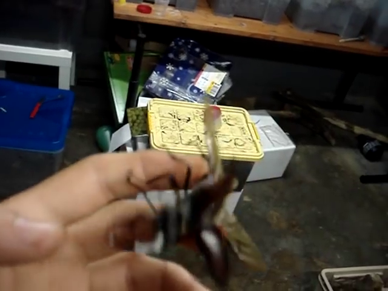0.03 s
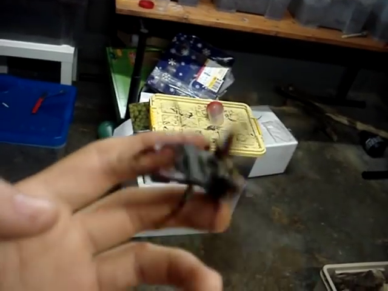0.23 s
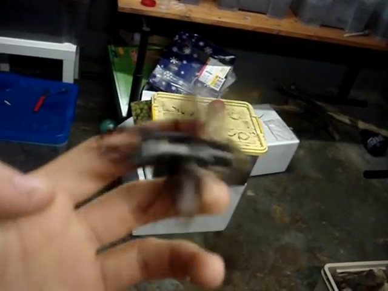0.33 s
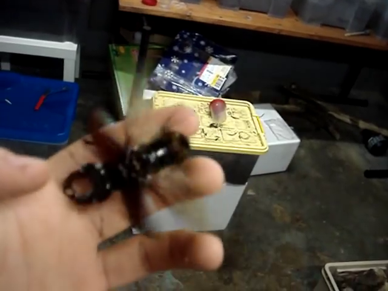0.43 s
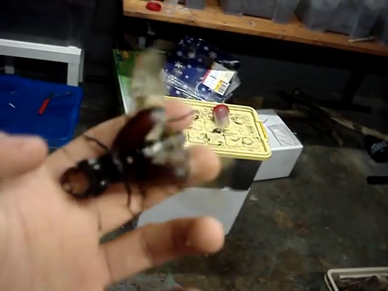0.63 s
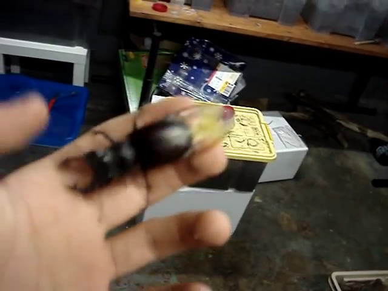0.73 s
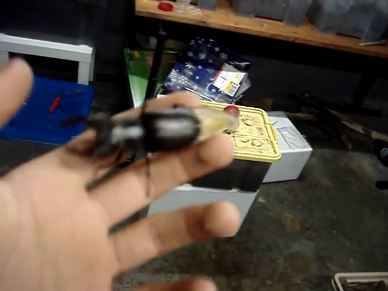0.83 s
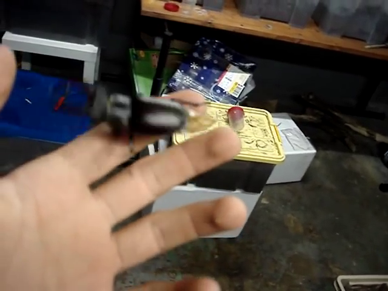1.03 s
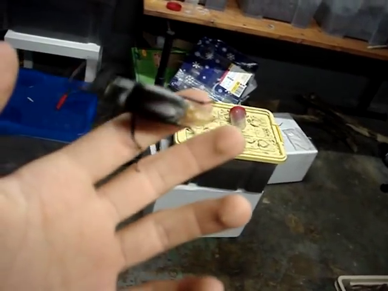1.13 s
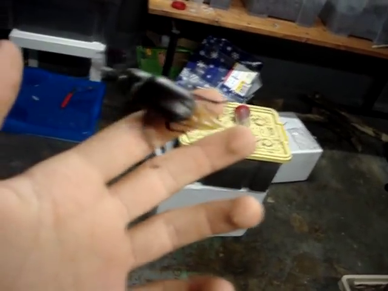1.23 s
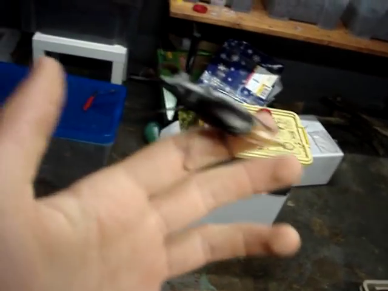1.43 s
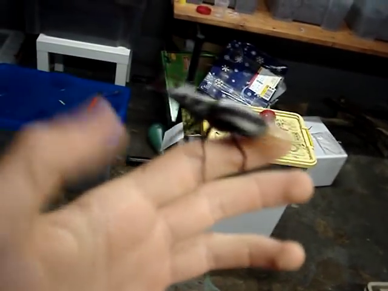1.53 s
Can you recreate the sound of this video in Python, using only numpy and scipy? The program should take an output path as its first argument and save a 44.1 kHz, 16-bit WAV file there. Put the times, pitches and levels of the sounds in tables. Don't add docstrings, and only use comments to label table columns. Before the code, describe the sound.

A large beetle's wings flutter in one brief, loud, crackling burst close up, in a quiet room

```python
import sys
import numpy as np
from scipy import signal
from scipy.fft import rfft, irfft
from scipy.io import wavfile
from scipy.ndimage import uniform_filter1d, minimum_filter1d

SR = 44100
rng = np.random.default_rng(int(sys.argv[2]) if len(sys.argv) > 2 else 0)


def persist_wave(psi):
    counts = np.round(np.clip(psi, -1, 1) * 32767).astype(np.int16)
    wavfile.write(sys.argv[1], SR, np.atleast_2d(counts).T)


def ratio(d):
    e = np.asarray(d, float) / 20
    return 10 ** e


N = 70560
T = np.arange(N) / SR

# t/s, clap level/dB, air push level/dB, body thud level/dB, scrape level/dB
WING_BEATS = [(0.2008, -36.5, -66, -37, -46), (.2250, -17.5, -39.5, -33, -36),
              (0.2491, -55, -36, -29, -43.5), (0.2707, -9, -28, -21, -24.5), (0.2931, -11, -36, -23, -28),
              (0.318, -11.5, -39, -20, -28.5), (0.3426, -6.5, -27, -26, -25.5),
              (0.3657, -8, -23, -29.5, -25), (0.3893, -9, -23.5, -41.5, -25.5),
              (0.4133, -12, -21.5, -31, -26.5), (0.4357, -13.5, -23.5, -33, -27),
              (0.4573, -13.5, -23, -34, -53), (0.4819, -16, -57, -35, -30), (0.5056, -13.5, -58, -49, -40)]
# t/s, level/dB, f/Hz
MEMBRANE_SNAPS = [(0.2489, -23.5, 1100), (0.2502, -17.5, 2000), (0.2722, -15, 4440), (0.2844, -24.5, 970),
                  (0.3197, -9.5, 4500), (.3463, -30, 3210), (0.3685, -14.5, 1076), (0.3765, -19, 4600),
                  (0.392, -16, 2800), (0.409, -21, 5000), (0.4142, -9.5, 2950), (.4325, -14, 6000),
                  (0.4359, -14.5, 1400), (.4548, -16, 5500), (0.4704, -14.5, 2500), (0.4817, -14.5, 3670),
                  (0.495, -19, 6400), (0.5181, -20.5, 2000), (0.5244, -18.5, 1800), (0.5292, -22, 2500),
                  (0.557, -23.5, 1500), (.5820, -34.5, 1500), (0.607, -29.5, 1100), (0.6379, -25.5, 3580),
                  (0.7184, -38.5, 500)]
# t/s, level/dB, brightness/1 (0 dull to 1 bright)
RUSTLE_COURSE = [
    (.18, -78, .2),
    (.23, -47.5, 0.6),
    (.3, -37.5, 0.2),
    (.39, -36.5, 0.32),
    (0.441, -34, 0.81),
    (.5, -33, 0.91),
    (.56, -43, 1),
    (0.641, -55, 0.64),
    (0.741, -58, 0.27),
]
# f/Hz, bandwidth/Hz, level/dB
CLAP_MODES = [(1100, 407, -11), (2800, 760, -4.5), (4246, 860, 1), (6000, 775, -4), (8560, 2700, -2.5)]
# f/Hz, spectral level/dB
MEMBRANE_SPECTRUM = [(120, -28), (220, -0.5), (900, -1.5), (1700, -5), (3300, -4), (4300, -2.5), (5800, -2),
                     (10000, -4.5), (13000, -56)]
# f/Hz, spectral level/dB
HISS_SPECTRUM = [(12, -54), (20, -22.5), (141, -2.5), (243, -1.5), (323, -1.5), (938, -6.5), (2160, -12.5),
                 (2590, -12.5), (10000, -21), (13000, -86), (22000, -120)]
# f/Hz, spectral level/dB
WAKE_SPECTRUM = [(15, -1), (60, 3), (180, -2), (400, -33), (1000, -53)]
# t/s, level/dB, f/Hz, bandwidth/Hz
CLAW_TICKS = [
    (.9135, -42, 2100, 110),
    (1.005, -42, 3600, 500),
    (1.417, -44.5, 2130, 110),
]

HISS_DB = -51.5
GRAINS_PER_S, GRAIN_DB, GRAIN_SHARE = 3000, 4, 0.56
GRAIN_LOW_HZ, GRAIN_HIGH_HZ, GRAIN_DAMPING = 714, 9400, 0.38
DULL_HZ, DULL_DB_PER_OCT = 4500, -22.5
UPSTROKE, UPSTROKE_DB, UPSTROKE_S = 0.486, 2.5, 0.0016
WAKE_DB, WAKE_SHARE = -50.5, 0.9
PUSH_RISE_S, PUSH_FALL_S, SUCK_S, SUCK = 0.0007, 0.0023, 0.0038, 0.3
SCRAPE_LEAD_S, SCRAPE_RISE_S, SCRAPE_HOLD_S, SCRAPE_FALL_S = 0.0024, 0.0025, 0.0038, 0.002
CLAP_SPREAD_DB, THUD_HZ, THUD_WIDTH_HZ = 2.2, 368, 92
SOFT_CYCLES = 0.43
SNAP_DAMPING, SNAP_EDGE = 0.36, 0.73
WING_LOW_HZ = 164
ROOM_DB, ROOM_T60_S = -10.5, 0.53
BASS_CUT_HZ, EDGE_HZ = 13.3, 10150
STARVE_FROM_HZ, STARVE_DB, STARVE_DB_PER_KHZ = 3500, -20.5, -0.13
STARVE_CHANCE_DB, STARVED_DB = 5.5, -35
BLOCK, BAND_BINS, REACH_BLOCKS = 256, 6, 13


def evened(x):
    return x / np.sqrt(np.mean(x ** 2) + 1e-20)


def coloured(x, points):
    f, db = np.transpose(points)
    gain_db = np.interp(np.log(np.fft.rfftfreq(N, 1 / SR) + 1), np.log(f), db)
    return irfft(rfft(x) * ratio(gain_db), N)


def ring(s, hz, width):
    t = np.maximum(T - s, 0)
    onset = 1 - np.exp(-t * hz / SOFT_CYCLES)
    return -np.sin(2 * np.pi * hz * t) * np.exp(-np.pi * width * t) * onset


def bump(s, rise, fall):
    t = np.maximum(T - s, 0)
    pulse = (1 - np.exp(-t / rise)) ** 2 * np.exp(-t / fall)
    return pulse / pulse.max()


def hiss():
    slow = uniform_filter1d(uniform_filter1d(rng.standard_normal(N), size=3000), size=3000)
    return ratio(HISS_DB + 0.5 * evened(slow)) * evened(coloured(rng.standard_normal(N), HISS_SPECTRUM))


def crackle():
    size = ratio(GRAIN_DB * np.minimum(rng.exponential(1, N), 3.0)) * rng.choice([-1., 1.], N)
    size = size * (rng.random(N) < GRAINS_PER_S / SR)
    kind = rng.integers(0, 12, size=N)
    grains = np.zeros(N)
    for k, hz in enumerate(np.linspace(GRAIN_LOW_HZ, GRAIN_HIGH_HZ, num=12)):
        grain = hz ** 0.86 * ring(0, hz, GRAIN_DAMPING * hz)[:400]
        grains += signal.oaconvolve(size * (kind == k), grain)[:N]
    mix = GRAIN_SHARE * evened(grains) + (1 - GRAIN_SHARE) * rng.standard_normal(N)
    return evened(coloured(mix, MEMBRANE_SPECTRUM))


def rustle():
    s, db, bright = np.transpose(RUSTLE_COURSE)
    beats = np.array(WING_BEATS)[:, 0]
    upstrokes = beats[:-1] + UPSTROKE * np.diff(beats)
    swell = sum(np.exp(-((T - u) / UPSTROKE_S) ** 2) for u in upstrokes)
    sharp = crackle()
    dull = coloured(sharp, [(20, 0), (DULL_HZ, 0), (4 * DULL_HZ, 2 * DULL_DB_PER_OCT)])
    share = np.interp(T, s, bright)
    level_db = np.interp(T, s, db, -120, -120) + UPSTROKE_DB * swell
    return ratio(level_db) * (share * sharp + (1 - share) * dull)


def wake():
    s, db, _ = np.transpose(RUSTLE_COURSE)
    swing_db = np.interp(T, s, db - db.max(), -120, -120)
    return ratio(WAKE_DB + WAKE_SHARE * swing_db) * evened(coloured(rng.standard_normal(N), WAKE_SPECTRUM))


def pushes():
    out = np.zeros(N)
    for s, _, push_db, _, _ in WING_BEATS:
        suction = SUCK * np.exp(-((T - s + SUCK_S / 2) / SUCK_S) ** 2)
        out += ratio(push_db) * (bump(s, PUSH_RISE_S, PUSH_FALL_S) - suction)
    return out


def scrapes():
    envelope = np.zeros(N)
    for s, _, _, _, scrape_db in WING_BEATS:
        t = T - (s - SCRAPE_LEAD_S)
        rise = np.clip(t / SCRAPE_RISE_S, 0, 1) ** 2
        fall = np.exp(-np.maximum(t - SCRAPE_RISE_S - SCRAPE_HOLD_S, 0) / SCRAPE_FALL_S)
        envelope += ratio(scrape_db) * rise * fall
    return envelope * crackle()


def claps():
    out = np.zeros(N)
    for s, clap_db, _, thud_db, _ in WING_BEATS:
        spread = rng.standard_normal(len(CLAP_MODES))
        hit = np.zeros(N)
        for (hz, width, db), u in zip(CLAP_MODES, spread):
            hit += ratio(db + CLAP_SPREAD_DB * u) * ring(s, hz * (1 + 0.028 * u), width)
        out += ratio(clap_db) * hit / abs(hit).max()
        out += ratio(thud_db) * ring(s, THUD_HZ * (1 + 0.18 * spread[0]), THUD_WIDTH_HZ)
    return out


def snaps():
    out = np.zeros(N)
    for s, db, hz in MEMBRANE_SNAPS:
        pop = ring(s, hz, SNAP_DAMPING * hz) + SNAP_EDGE * ring(s, 6200, 2400)
        out += ratio(db + 3.5) * pop
    return out


def ticks():
    return sum(ratio(db) * ring(s, hz, width) for s, db, hz, width in CLAW_TICKS)


def room(x):
    taps = np.zeros(SR // 2)
    at = np.arange(300, len(taps) - 22, 22)
    taps[at + rng.integers(0, 22, len(at))] = rng.choice([-1., 1.], len(at))
    taps = signal.lfilter([0.5], [1, -0.45], taps) * ratio(-60 * T[:len(taps)] / ROOM_T60_S)
    return signal.fftconvolve(x, taps / np.linalg.norm(taps))[:N]


def scene():
    high_pass = signal.butter(2, WING_LOW_HZ, "high", fs=SR, output="sos")
    wings = signal.sosfilt(high_pass, claps() + scrapes() + snaps() + ticks() + rustle())
    return (wings + ratio(ROOM_DB) * room(wings) + pushes() + hiss() + wake())[None]


def starve(x):
    hz, _, z = signal.stft(x, SR, window="cosine", nperseg=BLOCK)
    treble = hz > STARVE_FROM_HZ
    band = np.arange(len(hz)) // BAND_BINS
    power = np.add.reduceat(abs(z) ** 2, np.arange(0, len(hz), BAND_BINS))
    power_db = 10 * np.log10(power + 1e-14)
    treble_db = 10 * np.log10((abs(z[treble]) ** 2).sum(0) + 1e-14)
    loud_db = -minimum_filter1d(-treble_db, size=REACH_BLOCKS)
    luck = np.repeat(rng.standard_normal(power_db.shape), 2, axis=1)[:, :z.shape[1]]
    margin_db = (power_db + STARVE_CHANCE_DB * luck)[band] - loud_db - STARVE_DB
    band_hz = band[:, None] * BAND_BINS * hz[1]
    margin_db -= STARVE_DB_PER_KHZ * (band_hz - STARVE_FROM_HZ) / 1000
    gone = np.clip(-margin_db, 0, 1) * treble[:, None]
    return signal.istft(z * ratio(STARVED_DB * gone), SR, window="cosine", nperseg=BLOCK)[1][:N]


def roll_off(x):
    return signal.sosfilt(signal.butter(12, 11340, fs=SR, output="sos"), x)


def record(dry):
    x = signal.sosfilt(signal.butter(1, BASS_CUT_HZ, "high", fs=SR, output="sos"), dry)
    low_pass = signal.firwin(255, EDGE_HZ, window=("kaiser", 7), fs=SR)
    x = signal.oaconvolve(x, low_pass[None], "same")
    mix = starve(x[0])[None]
    return roll_off(mix)


dry = scene()
out = record(dry)
persist_wave(out)
```